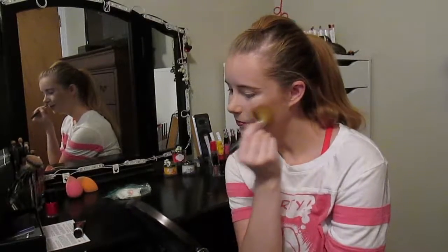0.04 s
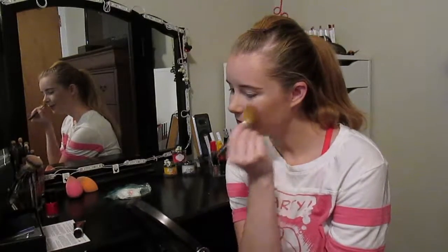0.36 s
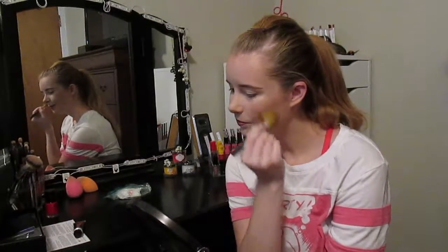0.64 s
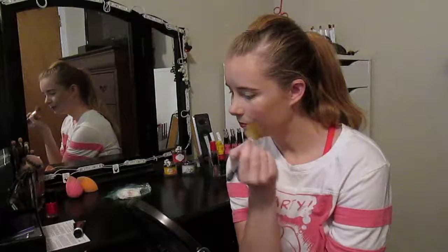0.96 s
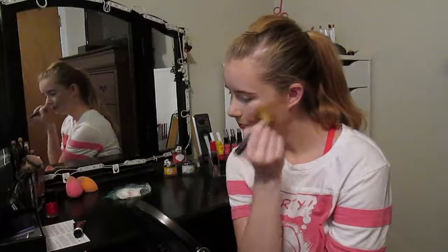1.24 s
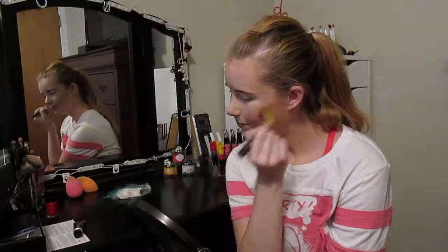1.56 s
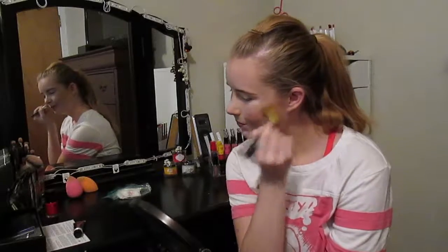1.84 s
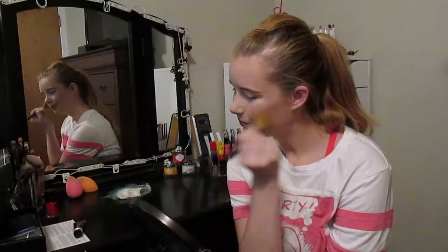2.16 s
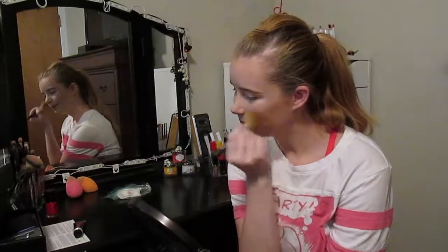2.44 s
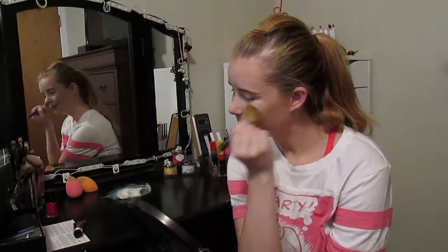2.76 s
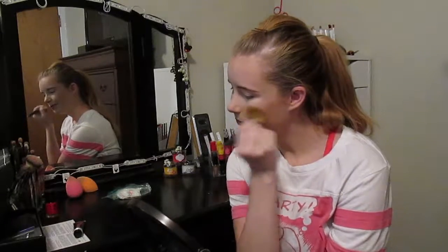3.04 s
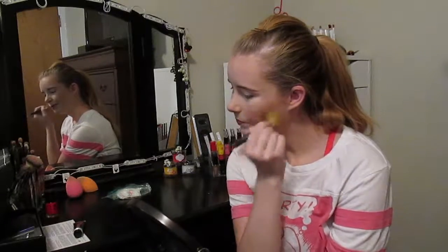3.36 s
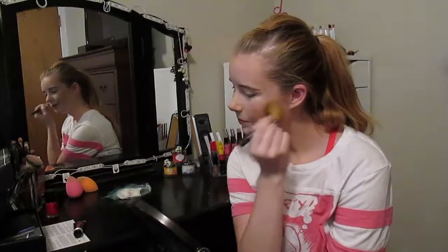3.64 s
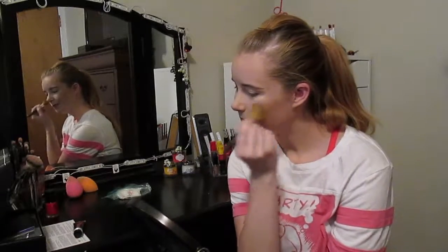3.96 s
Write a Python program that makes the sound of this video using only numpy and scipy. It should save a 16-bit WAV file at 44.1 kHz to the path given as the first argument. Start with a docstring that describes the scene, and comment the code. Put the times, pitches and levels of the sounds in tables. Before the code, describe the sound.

Faint, quick makeup brush strokes on a cheek in a quiet, rumbling room.

```python
"""Make-up brush on a cheek

A soft brush sweeps to and fro, about four strokes a second, its bristles slipping over the skin.
There is one crisp flick, a few tiny ticks and some dull thumps. A draught buffets the two microphone
ports, the quiet room hums and rumbles, and the camera hisses. Twice a faint, distant whine rises."""
import sys
import numpy as np
from scipy import signal
from scipy.fft import rfft, irfft
from scipy.io import wavfile
from scipy.ndimage import uniform_filter1d

SR = 44100
rng = np.random.default_rng(int(sys.argv[2]) if len(sys.argv) > 2 else 0)


def wav_record(signal):
    """Record a signal, one row per channel, as 16-bit PCM in the file named by sys.argv[1]."""
    frames = np.transpose(np.atleast_2d(signal))
    bounded = np.clip(frames, -1, 1)
    # unit amplitude maps onto the largest positive 16-bit level
    quanta = np.round(bounded * 32767).astype(np.int16)
    wavfile.write(sys.argv[1], SR, quanta)


N = 176400  # 4 seconds


# Brush strokes: peak_s, half_length_s, relative_db
BRUSH_STROKES = [(0.118, 0.12, -4.2), (0.315, 0.095, -1.3), (0.497, 0.048, -1.5), (0.729, 0.096, -1.9),
                 (1.32, 0.11, -5), (1.588, 0.125, -0.1), (1.882, 0.098, 0.2), (2.166, 0.13, -0.7),
                 (2.432, 0.1, -2.0), (2.675, 0.12, -0.6), (2.928, 0.115, -0.6), (3.182, 0.111, .7),
                 (3.432, 0.105, 0.2), (3.695, 0.11, 0.3), (3.953, 0.095, -.5)]
# Tone of bristles on skin: frequency_hz, relative_db
BRUSH_TONE = [(900, -36), (2000, -6), (4000, 2), (6500, 0), (8500, 5), (11000, 5.5), (13500, 2.5),
              (16000, 0.5)]

def brush():
    """Thousands of bristles slip over the skin; the pressure swells and eases unevenly in each stroke."""
    slips_per_s, rise_share, level_db = 14000, .7, -64
    pressure = 0
    for at, half_length, db in BRUSH_STROKES:
        length = 2 * half_length
        pressure += undb(db) * swell(at, length * rise_share, length * (1 - rise_share)) ** .8
    slipping = rng.random(N) < slips_per_s / SR
    slips = slipping * noise(likeness=.3) * undb(2 * rng.standard_normal(N))  # some slips are louder
    uneven_gain = undb(level_db + .5 * wander(67) + .7 * wander(25))
    return colour(slips, BRUSH_TONE) * pressure * uneven_gain * pan(-2)


# Tone of the flick: frequency_hz, relative_db
FLICK_TONE = [(1000, -17), (3500, -4), (5600, -4), (7000, -5), (9000, -1), (12000, -10), (16000, -15)]

def flick():
    """A bristle catches and flicks free with one crisp, dry sound."""
    burst = strike(at=.4805, attack_s=.0015, decay_s=.009)
    return undb(-56.5) * burst * colour(noise(likeness=.3), FLICK_TONE)


# Small ticks: start_s, relative_db
TICK_HITS = [(2.759, -2.5), (3.320, 1), (3.861, -1)]
# Pitches that ring in a tick: pitch_hz, width_hz, relative_db
TICK_RINGS = [(2200, 700, -3), (3930, 320, -5), (4480, 480, 0), (5000, 800, -9)]

def ticks():
    """Soft ticks, probably of the brush handle, ring briefly at a few high pitches."""
    body = sum(undb(db) * resonance(hz, width) for hz, width, db in TICK_RINGS)
    out = np.zeros((2, N))
    for at, db in TICK_HITS:
        ring = unit(filtered(noise(likeness=.8), body))
        out += undb(-58.5 + db) * strike(at, attack_s=.006, decay_s=.011) * ring
    return out


# Dull thumps: start_s, relative_db, left_minus_right_db
THUMP_HITS = [(.232, -5, 8), (2.048, 1.5, 6), (2.112, -2, 2), (3.455, -5, -6), (3.731, 1, -11)]
# Pitches that ring in a thump: typical_pitch_hz, decay_s, relative_db
THUMP_RINGS = [(95.3, 0.016, -1.5), (143.2, 0.0105, -1.5), (190.6, .011, -7)]

def thumps():
    """Soft bumps ring at a few low pitches that die fast, tuned a little differently each time."""
    out = np.zeros((2, N))
    for at, db, side_db in THUMP_HITS:
        for hz, decay, ring_db in THUMP_RINGS:
            pitch_hz = hz * (1 + .036 * rng.standard_normal())
            ring = np.sin(2 * np.pi * pitch_hz * (times() - at))
            envelope = strike(at, attack_s=.0051, decay_s=decay)
            out += undb(-27.5 + db + ring_db) * ring * envelope * pan(side_db)
    return out


# Puffs of air: peak_s, half_length_s, buffet_relative_db, eddy_relative_db, left_minus_right_db
AIR_PUFFS = [(0.011, 0.17, -0.5, -11, 8), (0.258, 0.11, 1.5, -6, 10), (0.415, 0.025, 5, -7, -4.5),
             (0.793, 0.057, -8, -14, 16), (0.905, 0.097, -4.5, -3.5, 10), (1.077, 0.092, -4.5, -6, -7.5),
             (1.284, 0.036, -11, -19, -17), (1.47, 0.085, -2, -12, 6), (1.56, 0.047, 0.5, -6, 10),
             (1.76, 0.19, 0, -8.5, 0.5), (2.05, 0.11, 1.5, 2.5, 5.5), (2.133, 0.073, 2.5, -0.5, 5),
             (2.495, 0.081, 1.5, -18, -9), (2.847, 0.081, -5, -8, 1), (3.22, 0.23, -6.5, -17, 1.5),
             (3.476, 0.1, 0.5, 0, -7), (3.636, 0.15, -1.5, -4.5, 4.5), (3.748, 0.052, 3, -1, -12),
             (3.807, 0.038, 5.5, -4, -11), (3.938, 0.164, -0.5, -2.5, 3)]
# Tone of the slow buffeting: frequency_hz, relative_db
BUFFET_TONE = [(8, -9), (20, 4), (42, 5.5), (70, 1.5), (110, -4.5), (170, -29.5), (300, -38.5), (700, -67)]
# Tone of the eddies (small swirls of air): frequency_hz, relative_db
EDDY_TONE = [(40, -17), (80, 2.5), (130, 7), (190, -4), (300, -21), (500, -37), (1000, -71)]

def draught():
    """Moving air buffets the two microphone ports; puffs also shed finer eddies."""
    steady_db, puff_db, swirl_db = -40, -30, -38
    buffet_power, eddy_power = undb(steady_db) ** 2, 0
    for at, half_length, db, eddy_db, side_db in AIR_PUFFS:
        puff = pan(side_db) * swell(at, half_length, half_length)
        buffet_power += (undb(puff_db + db) * puff) ** 2
        eddy_power += (undb(swirl_db + eddy_db) * puff) ** 2
    buffet = colour(noise(likeness=-.7), BUFFET_TONE) * np.sqrt(buffet_power)
    eddies = colour(noise(likeness=-.45), EDDY_TONE) * np.sqrt(eddy_power)
    return buffet + eddies


# Tone of the room's rumble: frequency_hz, relative_db
RUMBLE_TONE = [(30, -2.5), (80, -2.5), (125, 4), (165, -2.5), (220, -3.5), (265, -3.5), (330, -6.5),
               (400, -10.5), (480, -11), (560, -16.5), (750, -19.5), (900, -23), (1200, -22.5), (1800, -38),
               (3000, -35.5), (6000, -52)]
# How alike left and right are: frequency_hz, likeness (0 unrelated, 1 the same)
RUMBLE_LIKENESS = [(60, 1), (260, 0.84), (450, 0.74), (750, 0.44), (1300, 0.23), (3000, 0)]
# Pitches the room rings at: pitch_hz, width_hz, boost_db
ROOM_RINGS = [(224, 24, 4), (261, 17.8, 6.5), (331, 7.2, 4), (469, 52, 1.5)]
# Overall loudness of the rumble: time_s, level_db
RUMBLE_LOUDNESS = [(0, -47.5), (.6, -45.5), (1.3, -46.5), (1.9, -46), (2.4, -47), (3.1, -46.5), (4, -47)]
# Rise and fall of the drone, one low band of the rumble: time_s, boost_db
DRONE_BOOST = [(0, 0), (.6, 1.5), (1.1, 2.5), (1.35, 2.5), (1.8, -1.5), (2.3, -2.5), (2.9, -2.5), (3.5, -1),
               (4, 1)]

def room():
    """The room rumbles and rings at a few pitches, while its low drone swells and sinks."""
    drone_hz, drone_octaves = 185, .7
    boost_db = sum(db * resonance(hz, width) for hz, width, db in ROOM_RINGS)
    air = noise(likeness=over_frequency(RUMBLE_LIKENESS))
    rumble = colour(filtered(air, undb(boost_db)), RUMBLE_TONE)
    octaves_away = np.log2((frequencies() + 1) / drone_hz)
    drone = filtered(rumble, np.exp(-(octaves_away / drone_octaves) ** 4))
    rumble += drone * (undb(over_time(DRONE_BOOST)) - 1)
    return rumble * undb(over_time(RUMBLE_LOUDNESS) + .5 * wander(8.23))


# Loudness of the motor hum: time_s, level_db
HUM_LOUDNESS = [(0, -46.5), (.3, -45), (.6, -46.5), (.8, -58.5), (1.3, -43), (1.78, -40.5), (2.1, -50.5),
                (2.5, -54), (2.95, -44), (3.35, -46), (4, -49)]

def motor_hum():
    """A motor's wavering hum reaches the two ports out of step."""
    pitch_hz, lag_rad, flutter_db = 107.8, 1.2, 1.2
    phase = 2 * np.pi * np.cumsum(pitch_hz * (1 + .007 * wander(9.72))) / SR
    tone = unit(np.sin([phase, phase + lag_rad]))
    return tone * undb(over_time(HUM_LOUDNESS) + flutter_db * wander(7.6))


# Two distant whines, a list of points each: time_s, pitch_hz, level_db, octave_level_db
WHINE_GLIDES = [
    [(1.56, 1185, -86, -95), (1.64, 1214, -72, -87), (1.7, 1261, -77, -87), (1.78, 1312, -73, -82),
     (1.92, 1334, -84, -95)],
    [(2.8, 705, -80, -86), (2.97, 741, -67, -80), (3.05, 780, -58, -71), (3.13, 812, -63.5, -73),
     (3.19, 832, -72, -77), (3.27, 856, -69, -73), (3.4, 875, -82, -83)],
]

def whine(points):
    """A far-off tone and its octave glide upward and level off, fluttering differently on each side."""
    fade_s = .058
    at, *columns = np.array(points).T
    hz, db, octave_db = (np.interp(times(), at, column) for column in columns)
    flutter = .5 * np.array([wander(40), wander(40)])
    phase = 2 * np.pi * np.cumsum(hz) / SR + flutter
    tone = undb(db) * unit(np.sin(phase)) + undb(octave_db) * unit(np.sin(2 * phase))
    fade = np.clip(np.minimum(times() - at[0], at[-1] - times()) / fade_s, 0, 1)
    return tone * fade * pan(2)


# Tone of the microphone hiss: frequency_hz, relative_db
HISS_TONE = [(300, 9.5), (1500, 6.5), (3000, 0.5), (5000, -1.5), (7300, -2), (8700, -1), (11500, -2),
             (14000, -5), (16000, -7)]

def camera_hiss():
    """The camera adds an even hiss and a thin electronic whistle."""
    whistle_hz = 15734
    whistle = unit(np.sin(2 * np.pi * whistle_hz * times()))
    hiss = colour(noise(likeness=.11), HISS_TONE)
    return undb(-61) * hiss + undb(-89.5) * whistle


def room_echo(x, decay_s, echo_db):
    """Add the room's blurred, fading echo, keeping about the same overall power."""
    tail = noise() * np.exp(-times() / decay_s)
    tail /= np.sqrt(np.sum(tail ** 2, axis=1, keepdims=True))
    echo = signal.fftconvolve(x, tail, axes=1)[:, :N]
    return (x + undb(echo_db) * echo) / np.hypot(1, undb(echo_db))


def undb(db):
    """Turn decibels into a number to multiply by."""
    return 10 ** (np.asarray(db) / 20)


def unit(x):
    """Scale to an average power of 1."""
    return x / np.sqrt(np.mean(x ** 2))


def times():
    """Time of each sample in seconds."""
    return np.arange(N) / SR


def frequencies():
    """The frequencies that make up a sound, in Hz."""
    return np.fft.rfftfreq(N, 1 / SR)


def over_time(rows):
    """Join (time_s, value) points by straight lines."""
    return np.interp(times(), *np.array(rows).T)


def over_frequency(rows):
    """Join (frequency_hz, value) points, giving each octave equal space."""
    hz, value = np.array(rows).T
    return np.interp(np.log(frequencies() + 1), np.log(hz), value)


def resonance(pitch_hz, width_hz):
    """A peak of height 1 around one pitch."""
    return 1 / (1 + (2 * (frequencies() - pitch_hz) / width_hz) ** 2)


def filtered(x, gains):
    """Turn each frequency up or down by its gain."""
    return irfft(rfft(x) * gains, N)


def colour(x, rows):
    """Shape a sound with a tone table, at an average power of 1."""
    return unit(filtered(x, undb(over_frequency(rows))))


def noise(likeness=0):
    """Stereo white noise whose sides are the same (1), unrelated (0) or opposite (-1)."""
    mid, side = rfft(rng.standard_normal((2, N)))
    mid *= np.sqrt((1 + likeness) / 2)
    side *= np.sqrt((1 - likeness) / 2)
    return irfft(np.array([mid + side, mid - side]), N)


def wander(steps_per_s):
    """Smooth random drift with a typical size of 1."""
    hold = int(SR / steps_per_s)
    steps = np.repeat(rng.standard_normal(N // hold + 1), hold)
    return unit(uniform_filter1d(uniform_filter1d(steps, hold), hold)[:N])


def pan(left_minus_right_db):
    """Left and right gains that place a sound without changing its power."""
    return unit(undb(np.array([[left_minus_right_db], [-left_minus_right_db]]) / 2))


def swell(at, rise_s, fall_s):
    """Smooth rise to 1 and fall back to silence."""
    since = times() - at
    position = np.clip(np.where(since < 0, since / rise_s, since / fall_s), -1, 1)
    return np.cos(np.pi / 2 * position) ** 2


def strike(at, attack_s, decay_s):
    """Rise quickly, then die away."""
    since = np.maximum(times() - at, 0)
    return np.minimum(since / attack_s, 1) * np.exp(-since / decay_s)


def scene():
    """The brush over the quiet room."""
    whines = room_echo(sum(whine(points) for points in WHINE_GLIDES), decay_s=.045, echo_db=-3)
    nearby = brush() + flick() + ticks() + draught() + thumps()
    return nearby + room() + motor_hum() + whines + camera_hiss()


def record(dry):
    """The camera cuts the highest treble; the sound fades in and out over a few milliseconds."""
    top_hz, fade_s = 15780, .006
    fade = np.minimum(np.minimum(times(), times()[::-1]) / fade_s, 1)
    treble_cut = signal.ellip(12, .1, 80, top_hz, fs=SR, output="sos")
    return signal.sosfilt(treble_cut, dry * fade)


dry = scene()
out = record(dry)
wav_record(out)
```